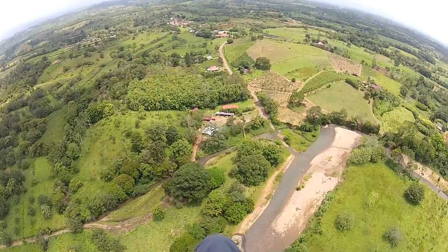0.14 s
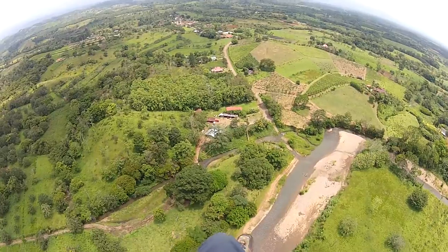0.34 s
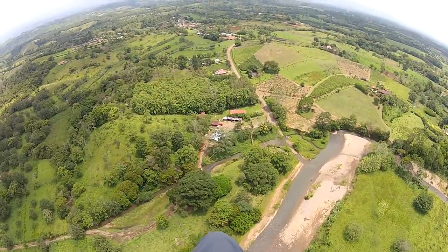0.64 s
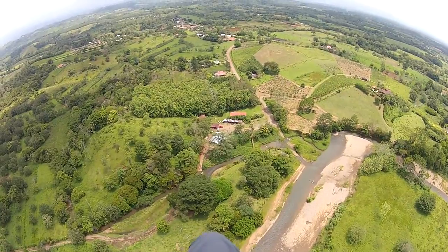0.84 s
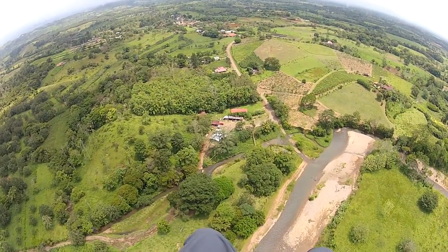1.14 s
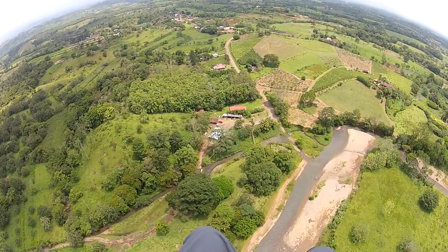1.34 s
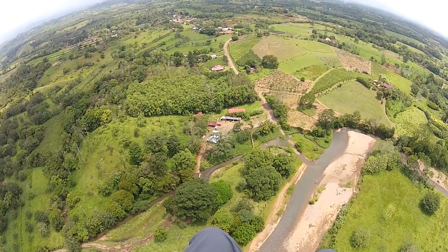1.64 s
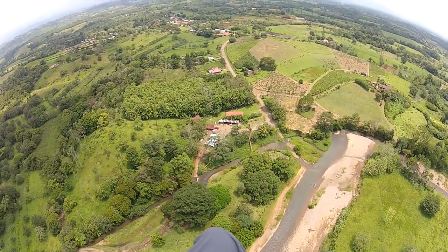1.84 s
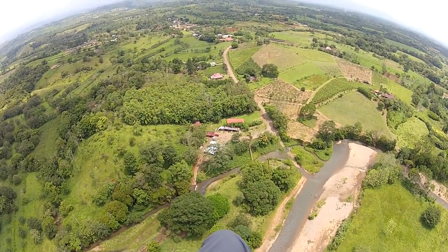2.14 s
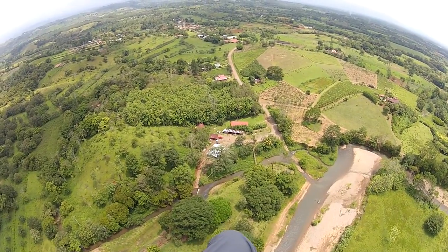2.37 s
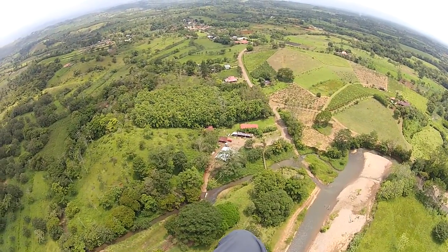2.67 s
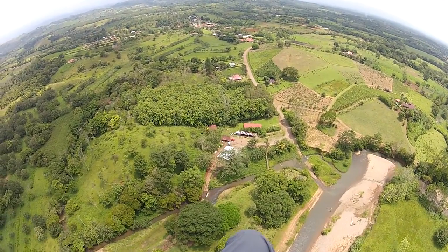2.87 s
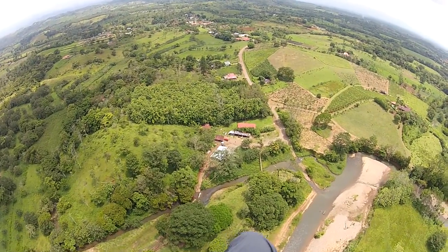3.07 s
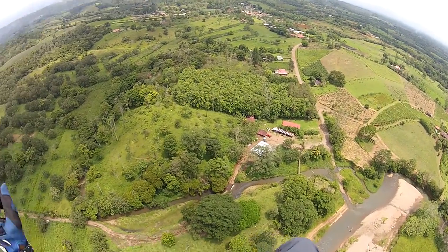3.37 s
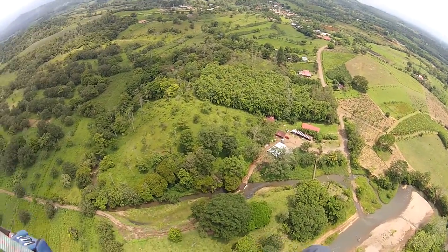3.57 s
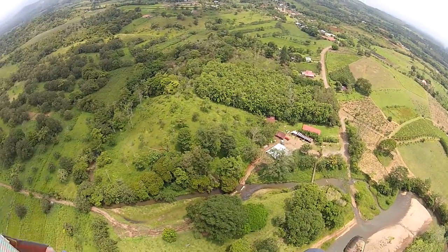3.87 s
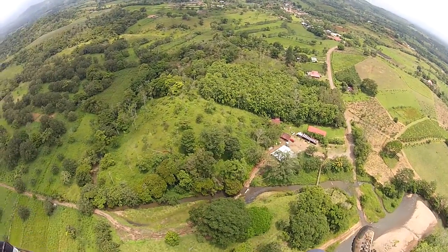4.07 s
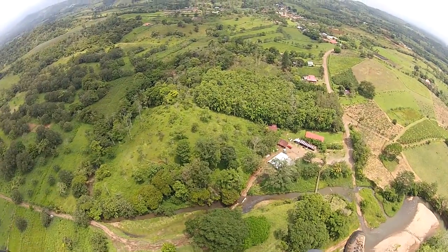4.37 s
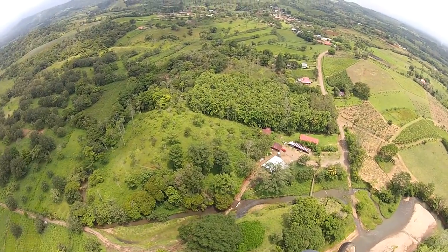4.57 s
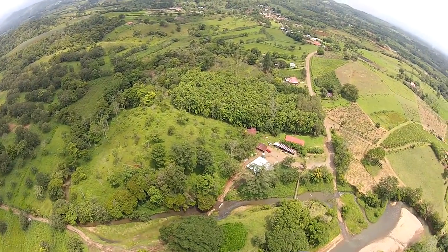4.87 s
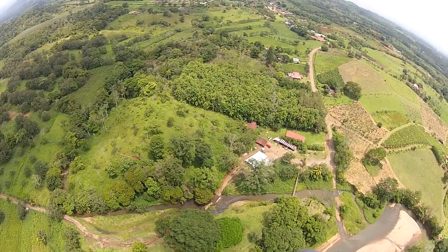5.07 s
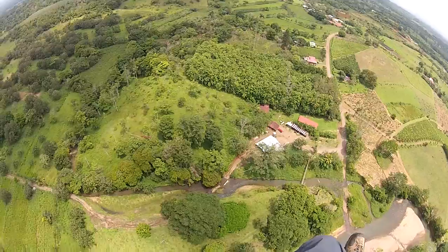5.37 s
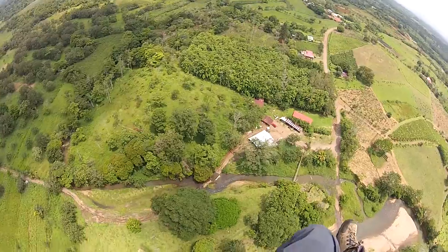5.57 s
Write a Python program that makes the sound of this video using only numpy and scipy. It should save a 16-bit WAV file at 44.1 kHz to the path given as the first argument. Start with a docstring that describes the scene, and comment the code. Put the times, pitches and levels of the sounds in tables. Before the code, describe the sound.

Close, dry outdoor flight sound: a steady motor drone near a low C, thick with propeller overtones and rougher exhaust buzz. Rapidly pulsing air noise and a soft treble swish ride on it, while low wind swells and fades. The first half is uninterrupted; in the second, loud little thumping clicks of air strike the helmet microphone, some clustered. Engine speed drifts only slightly, and the coarse input adds a harsh metallic edge.

```python
"""Paramotor in flight

A two-stroke engine turns a geared two-blade propeller that chops past the frame: tones locked to the blade
passes and the firings. Gusts, buffet, prop wash and tip swish are shaped noise at a helmet microphone.
Short air slaps can overload the input, which samples slowly and holds each value: sound mirrors into the treble.
"""
import sys
import numpy as np
from scipy import signal
from scipy.fft import rfft, irfft, next_fast_len
from scipy.io import wavfile
from scipy.ndimage import map_coordinates

SR = 44100
rng = np.random.default_rng(int(sys.argv[2]) if len(sys.argv) > 2 else 0)


def persist_wave(psi):
    """Save psi, clipped to +-1, as 16-bit WAV."""
    counts = np.round(np.clip(psi, -1, 1) * 32767).astype(np.int16)
    wavfile.write(sys.argv[1], SR, np.atleast_2d(counts).T)


def boost(x):
    """Linear amplitude factor 10**(x/20) for a level x in decibels (scalar or array-like)."""
    u = np.asarray(x, float) / 20
    return 10 ** u


N = 251811
TIME = np.arange(N) / SR
# air slaps on the diaphragm: t/s, pulse peak/dB
SLAP_PULSES = [(2.911, 0), (3.173, -5), (3.436, -2), (3.760, -4), (3.868, -3), (3.945, -2), (4.099, -.5),
               (4.268, -1.5), (4.3295, -3), (4.513, -1.5), (4.590, -4), (4.955, -7), (5.0405, -4),
               (5.138, -1.5), (5.581, -4)]


def unit(x):
    """Scaled to rms 1."""
    return x / np.sqrt(np.mean(x ** 2) + 1e-20)


def curves(rows):
    """One value per sample for each column after the time."""
    s, *columns = np.transpose(rows)
    return [np.interp(TIME, s, column) for column in columns]


def wobble(knots_per_s):
    """Smooth random curve: a spline through normal random knots."""
    knots = rng.standard_normal(int(TIME[-1] * 200) + 4)
    return map_coordinates(knots, [TIME * min(knots_per_s, 200)])


def bumps(rows):
    """Sum of bell-shaped level changes, in dB; the half length is to 1/e."""
    return sum(db * np.exp(-((TIME - s) / half_s) ** 2) for s, half_s, db in rows)


def coloured(x, spectrum):
    """x through a spectrum read on log frequency, rms 1."""
    size = next_fast_len(N + 8192)
    hz, db = np.transpose(spectrum)
    bin_hz = np.fft.rfftfreq(size, 1 / SR)
    gain = boost(np.interp(np.log(bin_hz + 1), np.log(hz + 1), db))
    return unit(irfft(rfft(x, size) * gain, size)[:N])


def tones(turns, orders, dips, ring, ring_db, waver_db, waver_turns):
    """Multiples of a rotation, phased by the pressure dips of each turn; multiple number ring gains ring_db."""
    place, first, last = np.transpose(dips)
    depth = first[:, None] + (last - first)[:, None] * TIME / TIME[-1]
    turning_s = np.clip(TIME - 3.1, -1.5, 1.4)  # seconds into the turn of the wing
    out = np.zeros(N)
    for n, level, drift_db_per_s in orders:
        level_db = level + drift_db_per_s * turning_s + waver_db * wobble(4.093) + ring_db * (n == ring)
        dip_phase = np.angle(np.exp(-2j * np.pi * n * place) @ depth)
        phase = 2 * np.pi * (n * turns + waver_turns * wobble(4.89)) + dip_phase
        out -= np.sqrt(2) * boost(level_db) * np.cos(phase)
    return out


def machine(passes):
    """Propeller tones, and exhaust tones shaded a little by the passing blades."""
    # tones of the blade pass: multiple, rms level/dB, drift as the wing turns/(dB/s)
    blade_tones = [(1, -30, .3), (2, -21.3, 1.2), (3, -26, .2), (4, -28, 1.1), (5, -18.3, 0), (6, -24, 2.4),
                   (7, -27, -1.5), (8, -27, -.8), (9, -35, 2), (10, -30, -1.5), (11, -30, .8), (12, -38, 1),
                   (13, -38, 0), (14, -42, .4), (15, -51, 0), (16, -45, .4), (17, -48, 0), (18, -57, -1),
                   (19, -52, -.7), (21, -59, 0)]
    # tones of the firing: multiple, rms level/dB, drift as the wing turns/(dB/s)
    firing_tones = [(1, -29, -.3), (2, -39, .6), (3, -34, 0), (4, -31, .6), (5, -27, 0), (6, -41, 1.4),
                    (7, -43, .5), (8, -50, -2), (10, -57, -2)]
    # frame spokes a blade sweeps past, each a pressure dip: place/pass, depth at first, depth at last
    spokes = [(.125, .15, .45), (.315, .35, .9), (.49, .55, .45), (.72, .6, .25), (.87, .1, .25)]
    # exhaust port, opens once a turn: place/crank turn, depth at first, depth at last
    port = [(.83, 1, 1)]
    # level changes of the fifth blade multiple: t/s, half length/s, change/dB
    frame_ring = [(.35, 0.38, -8), (1.05, .25, 2), (2.1, 1, -2.5), (4.4, 0.59, 2)]
    # level changes of the fifth firing multiple: t/s, half length/s, change/dB
    exhaust_ring = [(.9, 0.095, -5), (2.2, .9, 2.5), (5.3, .4, -10.5)]
    firings_per_pass = 1.924  # reduction gear
    prop = tones(passes, blade_tones, spokes, 5, bumps(frame_ring), waver_db=1.1, waver_turns=0.013)
    exhaust = tones(firings_per_pass * passes, firing_tones, port, 5, bumps(exhaust_ring),
                    waver_db=3.0, waver_turns=0.015)
    shading = 1 + 0.29 * np.cos(2 * np.pi * passes)
    return prop + exhaust * shading


def air(passes):
    """Noise of gusts, buffet, prop wash and blade tip swish; the last three pulse with each pass."""
    # air at the microphone: t/s, wind level/dB, tip swish level/dB
    air_levels = [(0.0, -18.5, -31.5), (0.3, -21, -33), (1.1, -21, -33), (1.3, -25, -33),
                  (1.8, -21.5, -32.5), (1.97, -21.5, -30), (2.2, -26, -34), (2.45, -17, -31.5),
                  (2.58, -25, -31), (2.8, -17, -32), (3.05, -23.5, -32.5), (3.2, -17.5, -30.5),
                  (3.4, -20.5, -33.5), (3.8, -14.5, -32), (4.05, -20, -34.5), (4.6, -21, -32.5),
                  (4.95, -15, -34), (5.15, -15.5, -33), (5.4, -25, -33.5), (5.71, -26, -33.5)]
    # noise spectra: f/Hz, relative density/dB
    gust_spectrum = [(10, -40), (25, -15), (60, -2.5), (100, 0.5), (160, -6.5), (300, -56), (600, -90)]
    buffet_spectrum = [(40, -50), (90, -37), (160, -0.5), (250, -3.5), (400, -6), (800, -38), (1600, -88)]
    wash_spectrum = [(100, -13), (250, -6.5), (450, -1), (640, 1), (730, -4), (980, -17.5), (1200, -27.5),
                     (1600, -33.5), (2500, -53.5)]
    swish_spectrum = [(600, -18), (1200, -7.5), (1450, -13.5), (1700, -10.5), (1950, -2.5), (2400, -3.5),
                      (3000, -2.5), (3470, -10.5), (4000, -10), (5080, -14.5), (5900, -29.5), (6500, -94)]
    # sudden level changes of the buffet: t/s, half length/s, change/dB
    swells = [(1.88, 0.045, -2), (2.56, 0.074, -9), (3.3, 0.23, 3), (5.03, 0.048, 7), (5.65, 0.076, 3.5)]

    def pulse(lag_passes):
        return np.cos(2 * np.pi * (passes - lag_passes))

    wind_db, tips_db = curves(air_levels)
    gust_db = wind_db + 0.5 + 0.67 * wobble(6)
    # buffet and wash follow a share of the wind's and the swish's swings
    buffet_db = -19 + 0.26 * (wind_db - wind_db.mean()) + bumps(swells) + 0.68 * wobble(4.03)
    wash_sinks_db_per_s = 0.11
    wash_db = -16.5 + 0.63 * (tips_db - tips_db.mean()) - wash_sinks_db_per_s * (TIME - TIME.mean())

    noise = rng.standard_normal((4, N))
    gust = coloured(noise[0], gust_spectrum)
    buffet = coloured(noise[3] * boost(2.05 * pulse(.31)), buffet_spectrum)
    wash = coloured(noise[1] * boost(0.25 * pulse(.35) + 0.26 * wobble(30)), wash_spectrum)

    # tips hiss louder for half of each pass, in uneven puffs, with a faint snap as the blade leaves
    gate_db = 3.1 * np.tanh(2.2 * pulse(.27))
    puffs_db = 0.16 * wobble(9) + 0.85 * wobble(35) + 0.26 * wobble(190)
    snap = np.diff(np.floor(passes - .45), prepend=-1) * boost(15)
    swish = coloured(noise[2] * boost(gate_db + puffs_db) + snap, swish_spectrum)
    return boost(gust_db) * gust + boost(buffet_db) * buffet + boost(wash_db) * wash + boost(tips_db) * swish


def slaps():
    """Each slap is a short bell-shaped suction pulse on the diaphragm."""
    sigma_s = .00048
    return -sum(boost(db) * np.exp(-.5 * ((TIME - s) / sigma_s) ** 2) for s, db in SLAP_PULSES)


def scene():
    """Machine, air and slaps at one microphone; the air noise ducks briefly so that each slap stands clear."""
    # engine speed: t/s, blade pass rate f/Hz
    speed = [(0.0, 65.17), (0.6, 65.17), (0.9, 65.29), (1.2, 65.32), (1.5, 65.45), (1.8, 65.63),
             (2.1, 65.97), (2.4, 65.64), (2.7, 65.07), (3.01, 64.83), (3.31, 64.63), (3.91, 64.88),
             (4.21, 65.08), (4.51, 65.44), (4.81, 65.67), (5.11, 65.68), (5.41, 65.57), (5.71, 65.54)]
    passes = np.cumsum(curves(speed)[0]) / SR
    duck_sigma_s = .002
    ducked = 1 - sum(np.exp(-.5 * ((TIME - s) / duck_sigma_s) ** 2) for s, _ in SLAP_PULSES)
    return (machine(passes) + ducked * air(passes) + slaps())[None]


def top_cut(x):
    """Nothing passes above the cut-off."""
    return signal.sosfilt(signal.butter(12, 16550, fs=SR, output="sos"), x)


def record(dry):
    """Lopsided input, sampled slowly, clipped, each value held four times, then band-limited."""
    hold_hz, top_hz = 12000, 15270
    lopsided = dry[0] - 0.048 * (dry[0] ** 2 - np.mean(dry[0] ** 2))
    places = np.arange(int(N * hold_hz / SR) + 2) * SR / hold_hz
    slow = map_coordinates(lopsided, [places], mode="nearest")
    held = np.repeat(np.clip(slow, -1, 1), 4)
    y = signal.resample_poly(held, 147, 160)[:N]  # 48 kHz to SR
    band_limit = signal.ellip(14, .005, 60, top_hz, fs=SR, output="sos")
    y = signal.sosfiltfilt(band_limit, y)
    return top_cut(y[None])


dry = scene()
out = record(dry)
persist_wave(out)
```